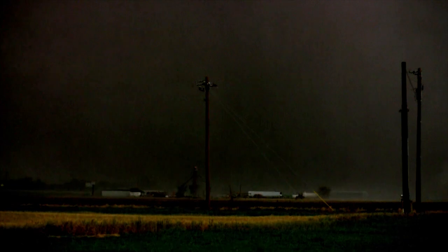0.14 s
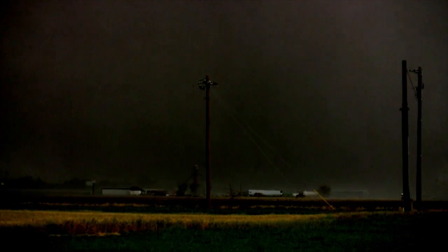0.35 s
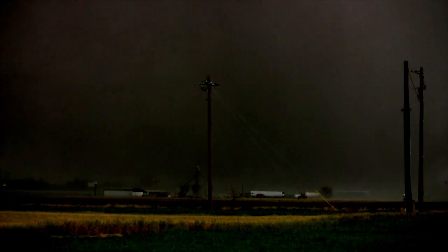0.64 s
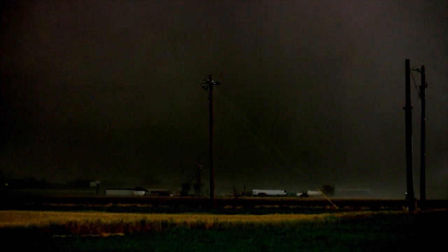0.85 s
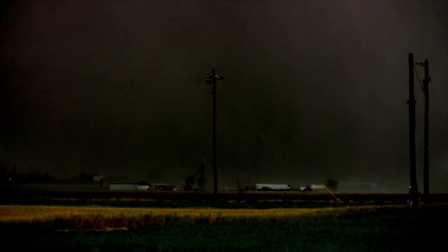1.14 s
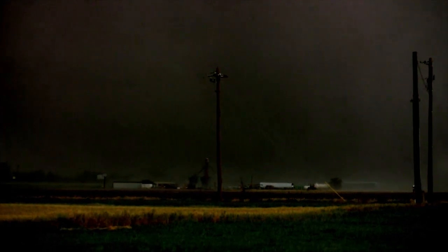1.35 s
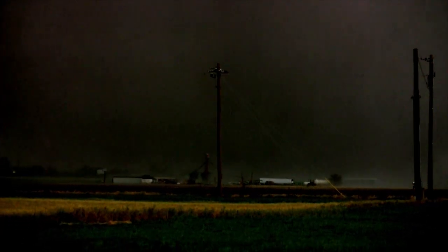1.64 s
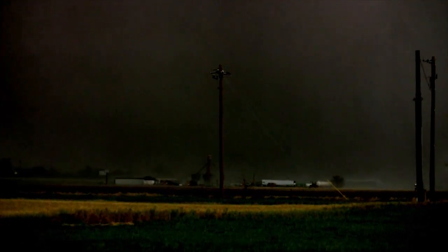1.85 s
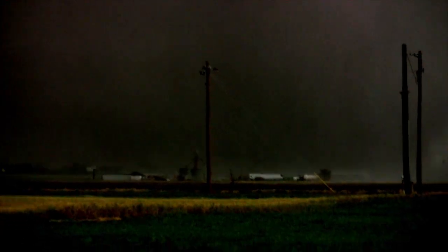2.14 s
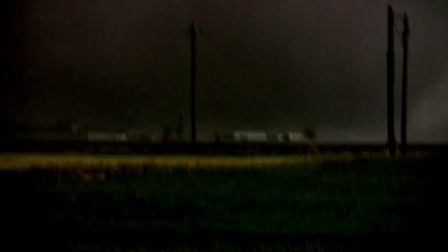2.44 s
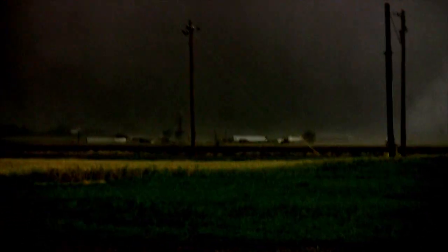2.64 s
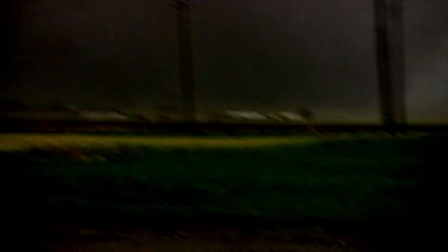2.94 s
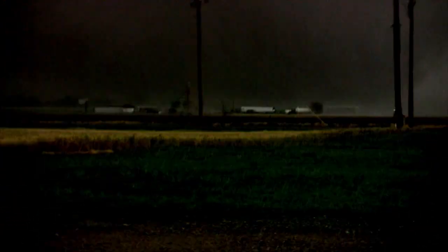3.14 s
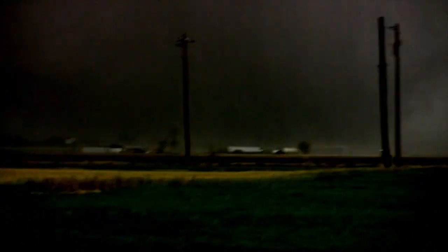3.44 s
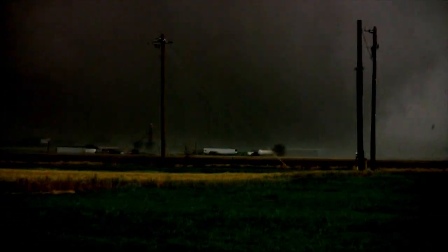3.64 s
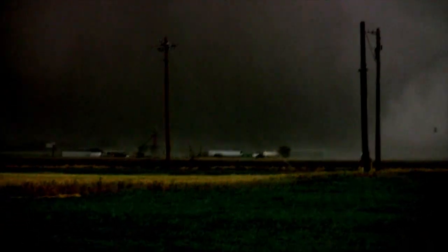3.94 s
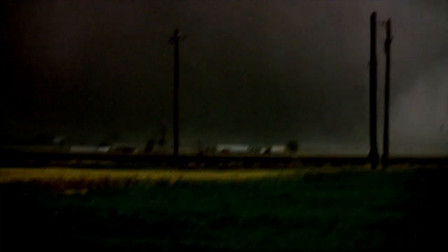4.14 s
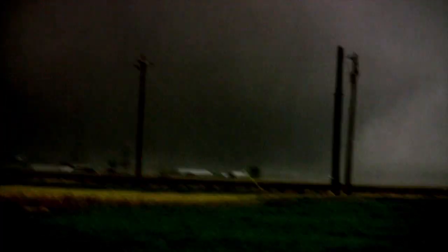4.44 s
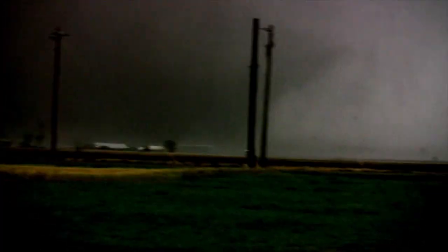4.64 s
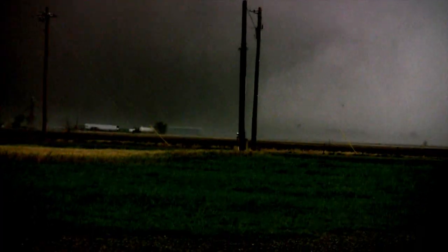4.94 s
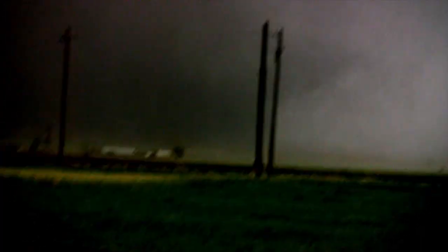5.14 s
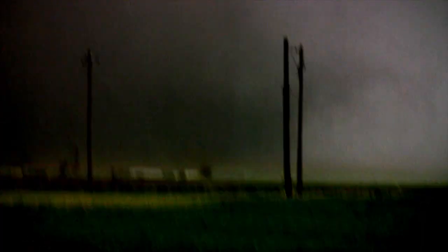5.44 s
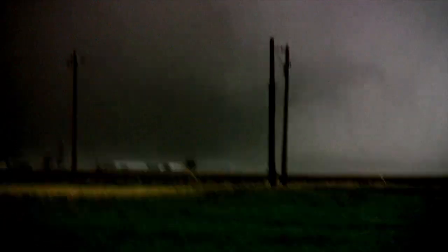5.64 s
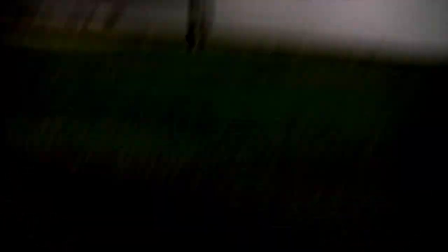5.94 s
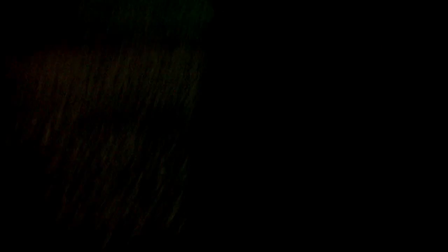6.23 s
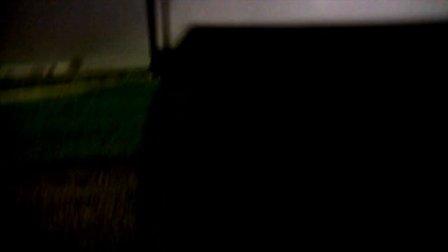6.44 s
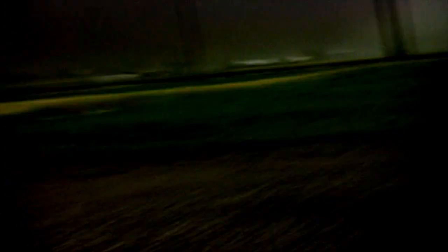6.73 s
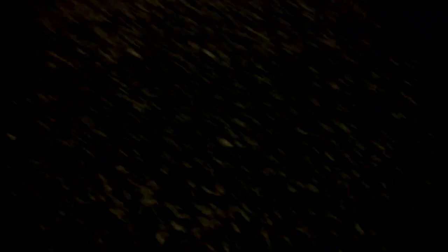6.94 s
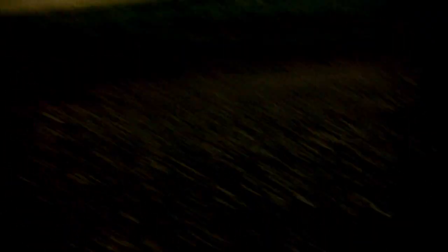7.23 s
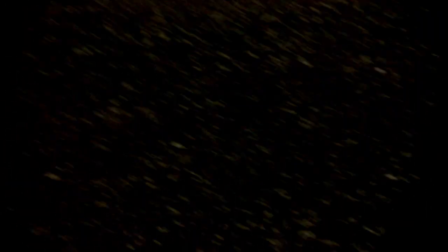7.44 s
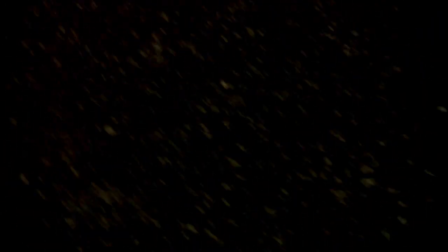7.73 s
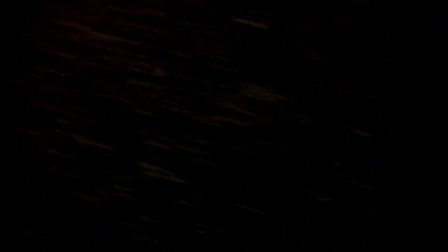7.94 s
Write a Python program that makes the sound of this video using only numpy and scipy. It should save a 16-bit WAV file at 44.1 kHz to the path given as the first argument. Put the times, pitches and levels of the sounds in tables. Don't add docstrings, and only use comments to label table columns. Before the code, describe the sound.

A dark storm roars steadily over open fields, then the camera holder turns and walks, adding gust bursts, sharp ticks, hollow knocks and gravelly rustle.

```python
import sys
import numpy as np
from scipy import signal
from scipy.io import wavfile
from scipy.ndimage import uniform_filter1d

SR = 44100
rng = np.random.default_rng(int(sys.argv[2]) if len(sys.argv) > 2 else 0)


def boost(x):
    u = np.asarray(x, float) / 20
    return 10 ** u


def generate_wav(sig):
    pcm = np.round(np.clip(np.atleast_2d(sig).T, -1, 1) * 32767).astype(np.int16)
    wavfile.write(sys.argv[1], SR, pcm)


N = 356751
TURN_S = 5.5


def evened(x):
    return x / np.sqrt(np.mean(x ** 2) + 1e-20)


def read(points, hz):
    f, value = np.transpose(points)
    return np.interp(np.log(hz + 1), np.log(f + 1), value)


def follow(rows, t):
    s, *columns = np.transpose(rows)
    return [np.interp(t, s, c) for c in columns]


def grid(size):
    return np.arange(N * 4 // size + 6) * size / 4 / SR, np.fft.rfftfreq(size, 1 / SR)[:, None]


def air(field_db, same, patchy_db, wide, long, lean_db=0):
    size = 2 * len(field_db) - 2
    a, b, c, d, patches = rng.standard_normal((*field_db.shape[::-1], 5)).T
    patches = uniform_filter1d(patches, int(wide), axis=0)
    patches = evened(uniform_filter1d(patches, int(long), axis=1))
    same = np.clip(same, -1, 1)
    left = a + 1j * b
    right = same * left + np.sqrt(1 - same ** 2) * (c + 1j * d)
    z = np.array([left * boost(lean_db / 2), right / boost(lean_db / 2)])
    z = z * boost(field_db + patchy_db * patches)
    return signal.istft(z, nperseg=size, noverlap=size * 3 // 4)[1][:, :N]


# [t/s, level/dB]
EXPOSURE = [(0, 0), (5.33, -0.5), (5.49, -3.5), (5.58, -1.5), (5.67, -6.5), (5.8, -1), (5.96, -8),
            (6.15, 1.5), (6.29, 0), (6.36, -5), (6.48, -6.5), (6.8, 1.5), (7.11, 0), (7.29, 1), (7.47, -4),
            (7.65, -9), (8.0, 0), (8.09, -4)]
SHELTER_S = (5.36, 5.5, 4.95)
SHELTER_DB = (-3.5, 2, 1.5)
NEARING_DB_PER_S = (-0.0731, 0.46, 0.4844)
FOLLOWS = (0.79, 0.98, 1)
RUMBLE_DB, HOWL_DB, RUSH_DB = -14.5, -25.5, -36
RETREAT_DB_PER_S = -0.66
SHELTER_RAMP_S, RUMBLE_LAG_S = 0.033, 0.025


def layers(t):
    retreat_db = RETREAT_DB_PER_S * np.maximum(t - SHELTER_S[0], 0)
    starts_db = RUMBLE_DB + retreat_db, HOWL_DB, RUSH_DB
    lags = RUMBLE_LAG_S, 0, 0
    levels = []
    for start_db, near, s, turn_db, share, lag in zip(
            starts_db, NEARING_DB_PER_S, SHELTER_S, SHELTER_DB, FOLLOWS, lags):
        nearing_db = near * np.minimum(t, s)
        shelter_db = turn_db * np.clip((t - s) / SHELTER_RAMP_S, 0, 1)
        levels.append(start_db + nearing_db + shelter_db + share * follow(EXPOSURE, t - lag)[0])
    return levels


# [f/Hz, level/dB per Hz]
ROAR = [(15, -53.5), (25, -23), (34, -56), (81, -4), (153, 1.5), (265, -2), (326, -6.5), (504, -9.5),
        (679, -17), (915, -24.5), (1450, -25), (2040, -34.5), (2450, -37.5), (3900, -52.5), (6000, -69.5),
        (7800, -100), (13200, -120)]
# [f/Hz, likeness 0-1]
SAME = [(60, 1), (270, 1), (2500, 0.99), (6000, 0.73)]
# [f/Hz, level/dB]
LEAN = [(60, 0.5), (170, 2), (490, 0.5), (1400, 1.5), (4010, -0.5), (11500, -8)]
# [f/Hz, level/dB]
TURNED = [(120, 0.5), (230, -2.5), (350, 3), (500, -5.5), (800, 0), (1200, 2), (1600, -0.5), (2500, 1.5)]


def roar():
    t, hz = grid(size=1024)
    rumble_db, howl_db, rush_db = layers(t)
    howl = np.clip(np.log2(hz / 330 + .01), 0, 1)
    rush = np.clip(np.log2(hz / 900 + .01) * 2, 0, 1)
    level_db = (1 - howl) * rumble_db + howl * (1 - rush) * (howl_db + 11.0) + rush * (rush_db + 21.0)
    buffet_db = 1.78 * evened(uniform_filter1d(rng.standard_normal(len(t)), size=3))
    turned = np.clip((t - 5.3) / 0.5, 0, 1)
    level_db = level_db + (read(TURNED, hz) + buffet_db) * turned
    lean_db = read(LEAN, hz) * (t < TURN_S)
    field_db = read(ROAR, hz) + level_db
    return boost(-6) * air(field_db, read(SAME, hz), patchy_db=0.93, wide=3.7, long=13, lean_db=lean_db)


# [t/s, peak level/dB, half length/s]
GUSTS = [(0.846, -41.5, 0.042), (2.547, -33.5, .06), (2.644, -33, .05), (3.431, -30.5, 0.025),
         (3.731, -40.5, 0.035), (4.037, -24.5, 0.034), (4.304, -40, .04), (4.771, -28, 0.015),
         (5.13, -37, 0.083), (5.335, -20.5, .03), (5.393, -21, 0.025), (5.464, -35.5, 0.059),
         (5.571, -22, 0.022), (5.648, -13, 0.025), (5.717, -29, 0.018), (5.814, -24.5, 0.024),
         (5.888, -8, 0.022), (6.322, -26.5, 0.018), (6.427, -33, .04), (7.0, -43, 0.045), (7.1, -44, 0.022),
         (7.377, -29.5, .05), (7.491, -26, 0.022), (7.606, -36.5, .03), (7.782, -40, 0.019),
         (8.038, -37, 0.06)]
# [f/Hz, level/dB per Hz]
THUMP = [(30, -45), (60, -6), (130, 4), (250, 6.5), (500, -5.5), (1000, -14.5), (2500, -49)]


def gusts():
    t, hz = grid(size=512)
    lumps_db = 2.0 * evened(uniform_filter1d(rng.standard_normal(len(t)), size=4))
    field_db = read(THUMP, hz) + lumps_db
    eddies = evened(air(field_db, 0, patchy_db=7.0, wide=3, long=5.4, lean_db=1.5))
    t = np.arange(N) / SR
    return eddies * sum(boost(db + 1.5) * np.exp(-((t - s) / half) ** 2) for s, db, half in GUSTS)


# [t/s, level/dB]
IDLE = [
    (0, -26.5),
    (4, -24),
    (5.4, -28),
    (7.4, -25.5),
    (7.6, -31),
    (8.09, -34.5),
]
# [multiple of the firing rate, level/dB]
EXHAUST = [(1, -19), (2, -12), (3, -3.5), (4, -10), (5, -4), (6, -7), (7, -3)]
FIRING_HZ = 26.25


def engine():
    wobble = uniform_filter1d(rng.standard_normal(N), size=5000)
    wobble = evened(uniform_filter1d(wobble, size=5000))
    t = np.arange(N) / SR
    turns = np.cumsum(FIRING_HZ * (1 + .008 * wobble)) / SR
    orders = sum(boost(db) * np.sin(2 * np.pi * round(k) * turns + 0.4127 * k * k) for k, db in EXHAUST)
    lean_db = np.array([[.55], [-.55]]) * (t < TURN_S)
    return np.sqrt(2) * boost(follow(IDLE, t)[0] + lean_db) * orders


# [middle t/s, peak level/dB, half length/s]
STROKES = [(2.5, -62, 0.24), (3.03, -62.5, .1), (3.553, -62, 0.41), (4.07, -59, .05), (4.188, -50.5, 0.088),
           (4.353, -50, 0.15), (4.618, -51, 0.085), (4.77, -62.5, .08), (4.9, -59.5, 0.11),
           (5.128, -55, .09), (5.385, -48, 0.096), (5.576, -50, 0.088), (5.792, -49, 0.1),
           (6.084, -47, 0.099), (6.273, -45.5, 0.082), (6.41, -50, 0.071), (6.68, -49, 0.15),
           (6.815, -47, 0.059), (6.986, -50, 0.15), (7.162, -47.5, .06), (7.283, -36.5, 0.051),
           (7.37, -52, 0.056), (7.54, -56.5, 0.11), (7.746, -52.5, 0.046), (7.976, -52.5, 0.12)]
STILL_DB, WALKING_DB, WALK_S = -67.5, -55.5, 4.95
SQUARENESS = 2.2


def strokes(t):
    power = boost(2 * np.where(t < WALK_S, STILL_DB, WALKING_DB))
    for s, db, half in STROKES:
        power = power + boost(2 * db) * np.exp(-2 * abs((t - s) / half) ** SQUARENESS)
    return 10 * np.log10(power)


# [f/Hz, level/dB per Hz]
CLOTH = [(1500, -25.5), (2500, -8.5), (3500, 1), (5000, -1), (7500, -3.5), (9800, -3.5), (10800, -4),
         (11900, -10.5)]
# [f/Hz, likeness 0-1]
WIDE = [(3000, 0.87), (6000, 0.82), (8000, 0.78), (10000, 0.09)]


def rustle():
    t, hz = grid(size=256)
    flicker_db = 2.0 * uniform_filter1d(rng.exponential(1, len(t)), size=3)
    field_db = read(CLOTH, hz) + strokes(t) + flicker_db
    return boost(-13.5) * air(field_db, read(WIDE, hz), patchy_db=1.5, wide=4.5, long=22)


# [t/s, peak level/dB, dullness 0-1, struck spot f/Hz]
TICKS = [(2.4447, -39.5, 1, 2980), (2.4894, -48, .8, 4700), (2.5313, -35.5, 1, 4370),
         (3.0194, -44.5, .8, 7200), (3.6994, -43, 0.7, 3200), (4.0222, -38.5, 0.94, 2800),
         (4.9982, -25.5, 0.87, 4150), (5.0634, -33, 1, 3650), (5.0874, -31, 0.95, 3370),
         (5.3522, -10, 0.88, 4040), (5.3933, -31.5, .9, 3270), (5.56, -29.5, 0.4, 9900),
         (5.5884, -36.5, .8, 3780), (5.876, -28, 1, 2030), (5.9774, -30, 1, 1840), (6.1389, -22, .5, 2080),
         (6.8189, -24.5, 0.6, 3280), (6.863, -29, 1, 3130), (6.9454, -26, 0.9, 8400),
         (7.0655, -36, 0.8, 2500), (7.079, -32, .8, 3000), (7.205, -29.5, 0.9, 2600),
         (7.2176, -24, 0.9, 9800), (7.2504, -27, 1, 10240), (7.2814, -27, .9, 6500), (7.3114, -28, 1, 8200),
         (7.3241, -29, .8, 2160), (7.4924, -37, 1, 3870), (7.6698, -44.5, 0.7, 2500),
         (7.8535, -43, 0.9, 4000)]
# [f/Hz, width/Hz, level/dB]
CASE = [(880, 670, -3.5), (1580, 510, 8), (2680, 340, 1), (3420, 93, -5), (4000, 170, -17)]
TICK_T60_S, SPOT_T60_S = 0.048, 0.021
CASE_RING_DB, SPOT_RING_DB = -1.5, -6
SPOT_FADE_DB_PER_OCTAVE = 8


def ticks():
    out, t = np.zeros((2, N + 8000)), np.arange(6000) / SR
    sharp, edge = signal.butter(1, 700, "high", fs=SR), signal.butter(1, 7000, fs=SR)
    for s, db, dull, spot_hz in TICKS:
        a, b = rng.standard_normal((2, len(t)))
        spread = .5 if s < 6.2 else .2
        blow = np.array([a + spread * b, a - spread * b])
        blow = blow * boost(-60 * t / TICK_T60_S) * (1 - np.exp(-t * 2500))
        crack = signal.lfilter([1], [1, -np.clip(dull, 0, .95)], blow)
        crack = signal.lfilter(*edge, signal.lfilter(*sharp, crack))
        push = blow * boost(25 * t / TICK_T60_S)
        ring = sum(boost(d) * signal.lfilter(*signal.iirpeak(f, f / w, fs=SR), push) for f, w, d in CASE)
        spot = boost(-60 * t / SPOT_T60_S) * np.sin(2 * np.pi * spot_hz * t) * (1 - np.exp(-t * 1500))
        spot_db = SPOT_RING_DB - SPOT_FADE_DB_PER_OCTAVE * max(np.log2(spot_hz / 4000), 0)
        tap = crack / abs(crack).max()
        tap = tap + boost(spot_db) * spot / abs(spot).max()
        tap = tap + boost(CASE_RING_DB) * ring / abs(ring).max()
        out[:, round(s * SR):][:, :len(t)] += boost(db + 1) * tap
    return out[:, :N]


# [t/s, peak level/dB, f/Hz, t60/s]
BUMPS = [(2.555, -2.5, 187, 0.035), (2.611, -17, 590, 0.028), (2.734, -4, 193, 0.093),
         (5.3534, -11.5, 880, 0.064), (5.352, -11.5, 1580, 0.043), (5.358, -2.5, 195, 0.13),
         (5.352, -20.5, 2690, .04), (5.3525, -20.5, 3620, .045), (5.353, -20, 2330, .045),
         (5.356, -9, 503, 0.066), (5.359, -8.5, 390, .05), (5.91, -9.5, 285, 0.035),
         (6.1449, -12.5, 1680, 0.014), (6.139, -10.5, 1280, 0.019), (6.14, -11.5, 600, 0.031),
         (6.111, -24, 298, 0.013), (6.147, -14, 224, 0.041), (6.258, -3, 200, 0.028),
         (6.403, -5, 207, 0.046), (6.411, -6.5, 564, 0.01), (6.604, -27, 249, 0.015),
         (6.866, -14, 322, 0.026), (7.206, -7, 1080, 0.017), (7.2179, -5, 434, 0.027),
         (7.25, -2, 219, 0.011), (7.328, -12, 1330, 0.0092), (7.596, -10.5, 590, 0.013),
         (7.635, -7, 215, 0.036), (7.758, -15, 616, 0.021), (8.013, -4, 196, 0.053)]
# [t/s, level/dB, f/Hz, half length/s]
CHIRP = (3.31, -58, 5900, .016)


def bumps():
    out, t = np.zeros(N + 8000), np.arange(6000) / SR
    for s, db, hz, t60 in BUMPS:
        swing = np.sin(2 * np.pi * hz * t) * (1 - np.exp(-6 * hz * t))
        out[round(s * SR):][:len(t)] += boost(db + 1.5 - 60 * t / t60) * swing
    s, db, hz, half = CHIRP
    t = np.arange(N) / SR - s
    squeak = boost(db) * np.exp(-(t / half - 1) ** 2 * 2) * np.sin(2 * np.pi * hz * t)
    return out[:N] + squeak


# [f/Hz, level/dB per Hz]
HISS = [(2650, -26), (4500, -5), (4880, -15), (6550, 2), (6900, -5.5), (7800, 4), (8920, 1.5), (9640, 6),
        (10400, -15.5), (11500, 13), (11900, -11.5), (15500, -50), (22000, -120)]
HISS_DB = -70


def hiss():
    t, hz = grid(size=1024)
    noise = air(read(HISS, hz) + 0 * t, .15, patchy_db=5.5, wide=3.3, long=5.3)
    return boost(HISS_DB + 3.5) * evened(noise)


def scene():
    return roar() + gusts() + engine() + rustle() + ticks() + bumps() + hiss()


# [f/Hz, level/dB]
SIDE_FLOOR = [(300, -28.5), (1000, -22.5), (2000, -9), (5000, -8.5), (9000, -13.5)]


def thin(x):
    lead = np.zeros(488)
    total, difference = x[0] + x[1], x[0] - x[1]
    hz, t, z = signal.stft([np.r_[lead, total], np.r_[lead, difference]], SR, nperseg=2048)
    power = abs(z) ** 2
    cell = uniform_filter1d(uniform_filter1d(power, size=7, axis=1), size=2, axis=2)
    band = uniform_filter1d(uniform_filter1d(power, size=41, axis=1), size=2, axis=2)
    treble = power[0, hz > 3500].sum(0)
    attack = uniform_filter1d(1. * (treble > 1.8 * np.roll(treble, 1)), size=3) > 0
    z *= (cell > .66 * band) | (hz[:, None] < 3500) | attack
    z[1] *= band[1] > band[0] * boost(2 * read(SIDE_FLOOR, hz))[:, None]
    mid, side = signal.istft(z, SR, nperseg=2048)[1][:, len(lead):][:, :N] / 2
    return np.array([mid + side, mid - side])


def top_cut(x):
    return signal.sosfilt(signal.butter(12, 12070, fs=SR, output="sos"), x)


def record(dry):
    dry = dry * np.minimum(.6 + np.arange(N) / SR / .004, 1)
    dry = signal.sosfilt(signal.butter(4, 46, "high", fs=SR, output="sos"), dry)
    dry = signal.sosfilt(signal.butter(10, 11250, fs=SR, output="sos"), dry)
    power_db = 10 * np.log10(abs(uniform_filter1d((dry ** 2).mean(0), size=300)) + 1e-12)
    fall = np.arange(N) * 88.0 / SR
    held_db = np.maximum.accumulate(power_db + fall) - fall
    over_db = np.maximum(held_db + 9, 0)
    ducked = np.clip(dry / boost(.5 * uniform_filter1d(over_db, size=200)), -1, 1)
    return top_cut(thin(ducked))


dry = scene()
out = record(dry)
generate_wav(out)
```